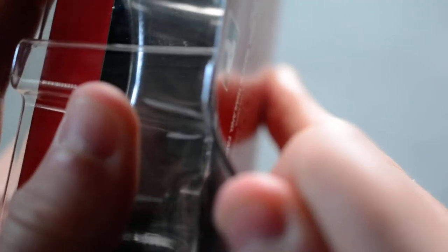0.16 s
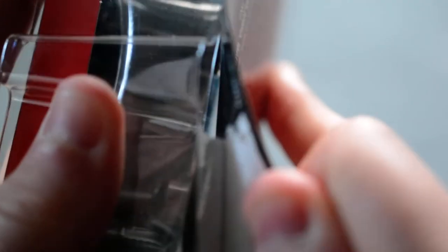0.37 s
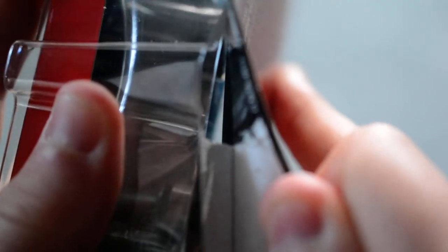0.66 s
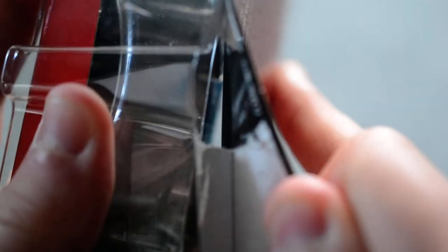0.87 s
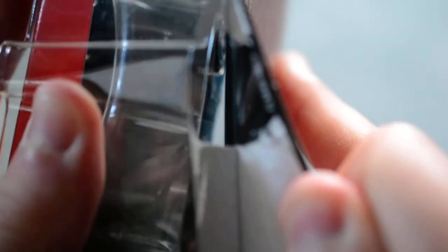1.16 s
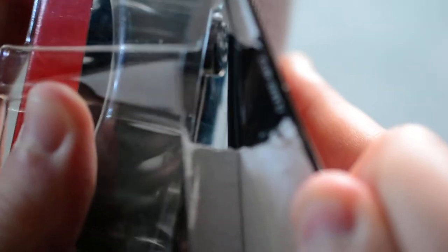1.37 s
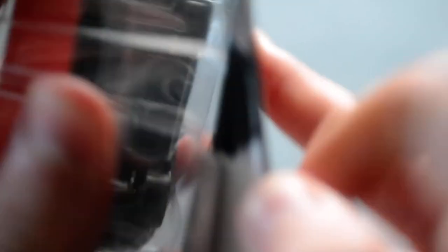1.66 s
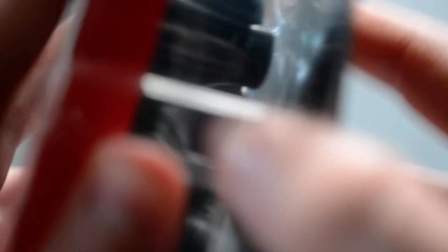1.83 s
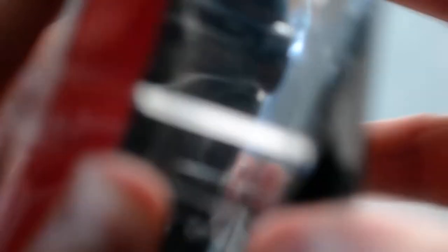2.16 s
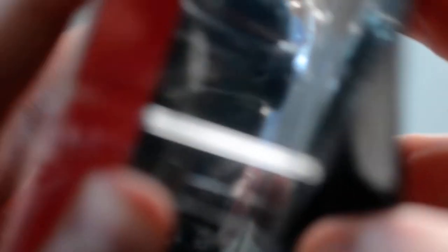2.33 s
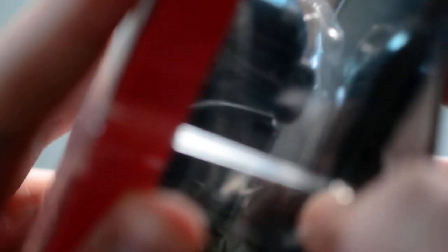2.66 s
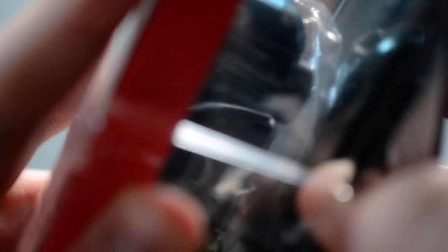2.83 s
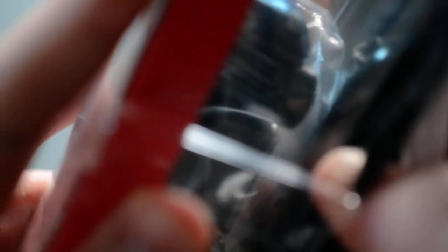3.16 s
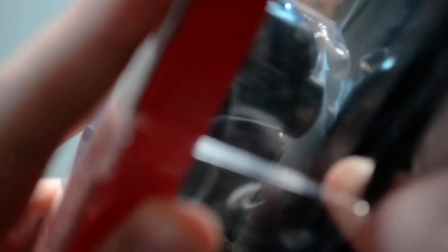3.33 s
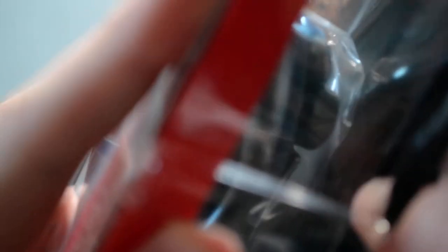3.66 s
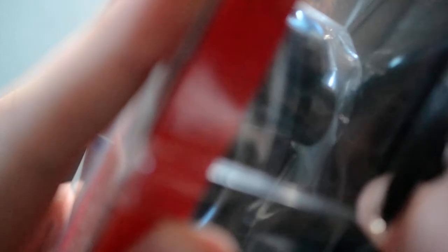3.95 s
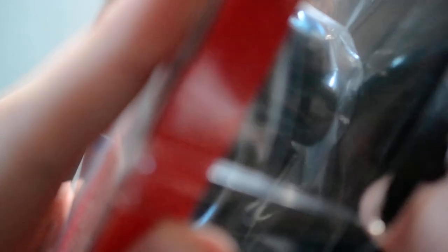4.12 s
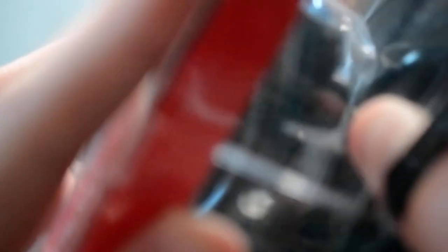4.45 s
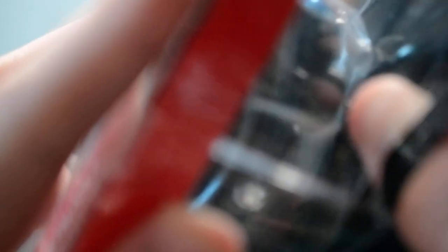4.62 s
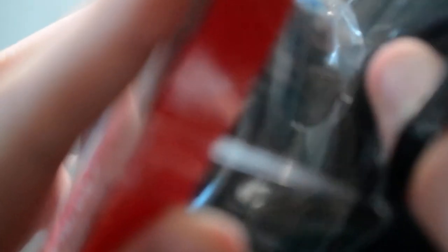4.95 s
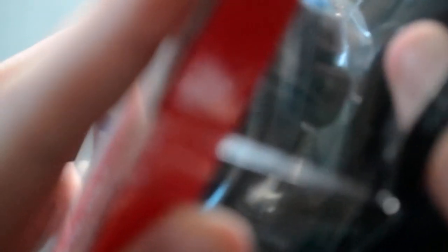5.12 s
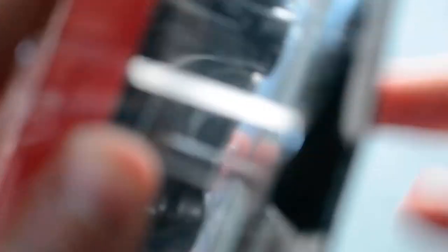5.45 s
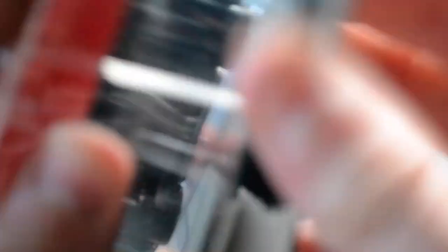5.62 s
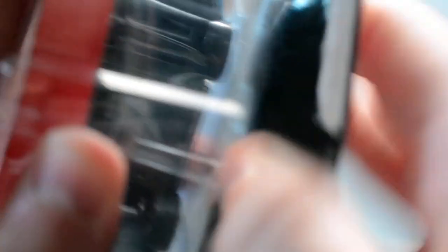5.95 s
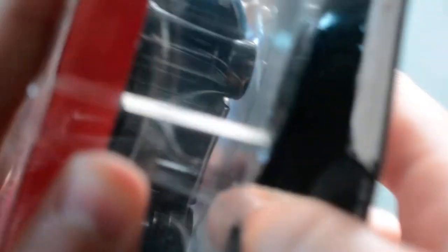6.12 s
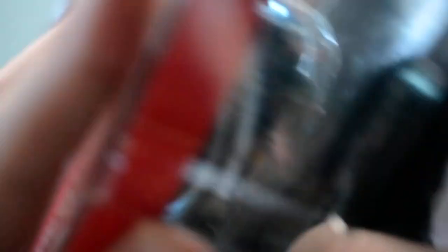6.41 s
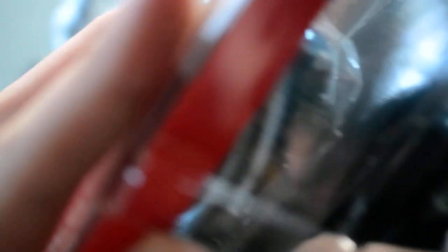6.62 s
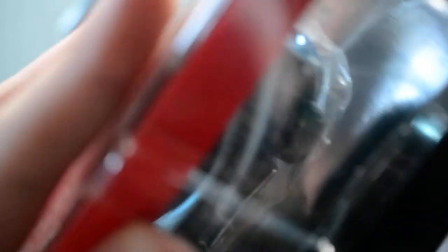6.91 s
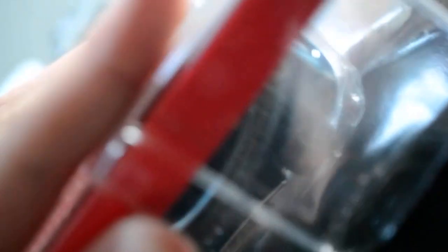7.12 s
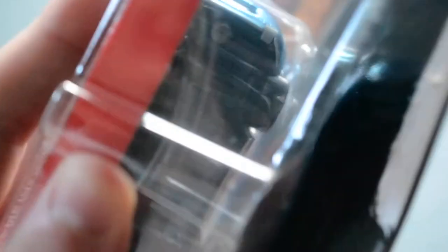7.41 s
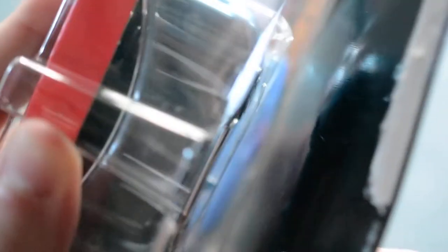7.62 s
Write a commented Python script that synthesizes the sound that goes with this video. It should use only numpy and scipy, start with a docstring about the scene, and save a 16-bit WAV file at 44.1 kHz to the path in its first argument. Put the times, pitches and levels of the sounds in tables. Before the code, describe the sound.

A hard plastic package crackles, creaks and snaps as fingers peel its glued seam open in a quiet room.

```python
"""A stiff plastic blister pack snaps and crackles as two hands pry it apart, close by in a small quiet room.
The glued seam peels in a fine crackle with ticks and short rips; the domes of the shell creak, click
and buckle with sharp snaps. Each pull builds up and lets go, the fingers shift and rub, and the hollow
pack gives dull knocks."""
import sys
import numpy as np
from scipy import signal
from scipy.io import wavfile

SR = 44100
rng = np.random.default_rng(int(sys.argv[2]) if len(sys.argv) > 2 else 0)


def unload_wav(signal):
    """Save mono or channel-first audio to the path in sys.argv[1] as 16-bit WAV at rate SR, clipped to [-1, 1]."""
    wavfile.write(
        sys.argv[1],
        SR,
        np.round(np.clip(np.atleast_2d(signal).T, -1, 1) * 32767).astype(np.int16),
    )


N = 343098
TIME = np.arange(N) / SR  # seconds through the scene
HIT_TIME = np.arange(2048) / SR  # seconds through one short hit


def amp(db):
    """Turns decibels into a gain."""
    return 10 ** (np.asarray(db) / 20)


def unit_level(x):
    """Scales a sound to an average (rms) level of 1."""
    return x / np.sqrt(np.mean(x ** 2) + 1e-20)


def unit_hit(x, span_s=0.012):
    """Gives a short sound the energy of span_s seconds at level 1."""
    return x * np.sqrt(span_s * SR / (np.sum(x ** 2) + 1e-20))


def look_up(points, hz):
    """Reads between the rows of a table, along a logarithmic frequency axis."""
    row_hz, value = np.transpose(points)
    return np.interp(np.log(hz + 1), np.log(row_hz + 1), value)


def add(mix, start_s, sound):
    """Mixes a sound in at its start time."""
    part = mix[max(round(start_s * SR), 0):][:len(sound)]
    part += sound[:len(part)]


def band(x, low_hz, high_hz, order=3):
    """Keeps the sound between two frequencies."""
    return signal.sosfilt(signal.butter(order, [low_hz, high_hz], "band", fs=SR, output="sos"), x)


def colour(x, tone, size=2048):
    """Filters a sound to follow a tone table, with no ringing ahead of a hit."""
    log_gain = np.log(amp(look_up(tone, abs(np.fft.fftfreq(size, 1 / SR)))))
    taps = np.fft.ifft(np.exp(np.conj(signal.hilbert(log_gain)))).real
    return signal.oaconvolve(x, taps[:size // 2])[:len(x)]


def strike(resonances, uneven_db=2.0, detune=0.048):
    """One blow rings several notes: the spot it hits sets their shares, and strain detunes them."""
    hz, width, db = np.transpose(resonances)[:, :, None]
    share, strain, side = rng.standard_normal((3, len(hz), 1))
    waves = np.sin(2 * np.pi * hz * (1 + detune * strain) * HIT_TIME) * np.exp(-np.pi * width * HIT_TIME)
    return unit_hit(np.sum(np.sign(side) * amp(db + uneven_db * share) * width * waves, 0))


def slips(per_s, spread_db):
    """A train of tiny random slips, a few much larger than the rest."""
    size = amp(spread_db * np.minimum(rng.exponential(1, N), 6.34))
    return size * rng.choice([-1, 1], N) * (rng.random(N) < per_s / SR)


# The notes the plastic shell rings at. Each row: pitch in Hz, width in Hz (wider dies sooner), level in dB.
SHELL_NOTES = [(850, 130, 5), (1030, 42, 5), (1500, 140, 4.5), (1784, 180, 0.5), (2350, 210, -2.5),
               (2646, 210, -5.5), (3166, 200, -3), (3594, 170, -6), (4040, 180, -11), (4760, 170, -6.5),
               (5570, 790, -8), (6560, 360, -8.5), (7430, 720, -11.5), (8900, 450, -20),
               (9060, 3100, -15.5)]


def crackle(per_s, spread_db, spots=16):
    """Tiny breaks at many spots of the seam, each ringing the shell in its own way."""
    breaks, spot = slips(per_s, spread_db), rng.integers(0, spots, N)
    rings = (signal.oaconvolve(breaks * (spot == k), strike(SHELL_NOTES))[:N] for k in range(spots))
    return unit_level(sum(rings))


def surges(per_s, depth_db):
    """A gain that swells and stalls at random, as the plastic catches and gives."""
    waits, heights = rng.random((1000, 2)).T
    times = np.cumsum(-np.log(waits)) / per_s
    return amp(np.interp(TIME, times, depth_db * (2 * heights - 1)))


def effort(moves, rest_db, build_db, relax_s, take_hold_s=0.016):
    """A gain for the hands: each move takes hold quickly, builds up force, then relaxes."""
    power = np.full(N, amp(rest_db) ** 2)  # the hands never hold quite still
    for start, length, db in moves:
        hold = np.clip((TIME - start) / take_hold_s, 0, 1)
        build = amp(db - build_db * np.clip(1 - (TIME - start) / length, 0, 1))
        relax = np.exp(-np.maximum(TIME - start - length, 0) / relax_s)
        power += (hold * build * relax) ** 2
    return np.sqrt(power)


# The tones of breaking glue and of bending plastic. Each row: frequency in Hz, level in dB.
GLUE_TONE = [(100, -18.5), (900, -9), (1700, 0), (3000, 5), (6000, 6), (9500, 10.5), (11000, 4),
             (12000, -13), (16000, -63.5)]
CREAK_TONE = [(100, -21), (500, -11), (950, -3), (1700, 0), (2600, -5), (11000, -29)]
# Pulls of the hands. Each row: start in seconds, length in seconds, peeling in dB, creaking in dB.
HAND_PULLS = [(0.0, 0.071, -52.5, -78), (0.261, 0.25, -50.5, -86), (0.535, 0.46, -49.5, -78),
              (1.003, 0.39, -46, -59), (1.582, 0.12, -56.5, -64), (1.744, 0.32, -67, -49),
              (2.115, 0.27, -64, -53), (2.604, 0.16, -58.5, -63), (2.874, 0.17, -58.5, -63),
              (3.186, 0.29, -55.5, -58), (3.5, 0.26, -50, -60), (3.899, 0.083, -46.5, -66),
              (4.063, 0.095, -57.5, -55), (4.247, 0.13, -62, -52), (4.769, 0.41, -59.5, -70),
              (5.578, 0.12, -59, -58), (5.933, 0.23, -55, -52), (6.247, 0.2, -53, -49),
              (6.499, 0.27, -57, -54), (6.792, 0.22, -46.5, -43.5), (7.112, 0.03, -50.5, -46.5),
              (7.218, 0.1, -54.5, -59), (7.384, 0.073, -57.5, -50), (7.682, 0.077, -50, -62)]


def pulls():
    """Each pull peels the glue in fine grains and bends the panels until they creak."""
    start, length, peel_db, creak_db = np.transpose(HAND_PULLS)
    pull = effort(zip(start, length, peel_db), rest_db=-83.5, build_db=6, relax_s=0.058)
    bend = effort(zip(start, length, creak_db), rest_db=-67.5, build_db=7.5, relax_s=0.055)
    grains = unit_level(crackle(per_s=55, spread_db=3) + 0.7 * crackle(per_s=2500, spread_db=2.2))
    grains *= surges(per_s=35, depth_db=4)
    peel = unit_level(colour(grains, GLUE_TONE))
    # the same grains shake the bent panels, along with slips of their own
    creak = unit_level(colour(grains + 0.8 * crackle(per_s=400, spread_db=4.5), CREAK_TONE))
    return peel * pull + creak * bend


def crease(run_s, chatter):
    """The force of a running crease: one jump, then a chatter that dies in a few milliseconds."""
    force = chatter * rng.standard_normal(len(HIT_TIME)) * np.exp(-HIT_TIME / run_s)
    force[0] = 1
    return force


def through_shell(force):
    """A short force sets the shell ringing."""
    return signal.fftconvolve(force, strike(SHELL_NOTES))[:len(HIT_TIME)]


# The notes of the hollow pack's air and walls. Each row: pitch in Hz, width in Hz, level in dB.
HOLLOW_NOTES = [(161, 390, -9.5), (254, 35, -10), (333, 5.9, 18.5), (453, 38, 9.5), (610, 53, 12)]


def thud():
    """A jolt rings the hollow pack, low and brief."""
    return unit_hit(band(strike(HOLLOW_NOTES) * np.exp(-HIT_TIME / 0.014), 150, 1500, order=2))


# Panels of the shell buckle. Each row: start in seconds, panel pitch in Hz, pop level in dB,
# sharpness in dB (how much louder the crack is than the pop).
PANEL_SNAPS = [(0.0656, 785, -18, -8), (0.1897, 1480, -17.5, 2), (1.5474, 1570, -41.5, -4),
               (1.567, 1330, -31.5, -26), (1.797, 920, -36, -5), (2.0596, 1100, -33, -13.5),
               (2.2903, 915, -19, -2.5), (3.2797, 1030, -25, -11.5), (3.6163, 1500, -27, -10),
               (3.9095, 1550, -29.5, -8.5), (3.996, 1340, -20, -8), (4.2759, 1106, -39.5, 5.5),
               (5.1774, 890, -21.5, 1.5), (5.346, 1380, -42, 0.5), (5.5624, 830, -50.5, 9),
               (5.5684, 980, -27.5, -22), (5.635, 900, -40.5, -1.5), (5.6974, 1030, -29.5, -2.5),
               (5.7248, 1430, -30.5, -29), (5.7548, 1490, -34, -2.5), (5.9765, 1010, -30.5, 1.5),
               (6.3436, 1500, -36.5, -2.5), (6.3572, 1500, -24.5, 1.5), (6.803, 1380, -30.5, -9.5),
               (6.929, 1770, -48, 14), (7.0159, 1516, -10, -6.5), (7.1504, 1095, -20.5, -22.5),
               (7.2257, 1610, -23.5, -8), (7.285, 1370, -38, 4.5), (7.32, 1720, -51, 14),
               (7.4236, 970, -31.5, -3), (7.742, 1750, -26.5, -2)]


def snaps(stray_octaves=0):
    """A panel flips over: it pops at its own pitch, the crease cracks, and the hollow thuds."""
    out = np.zeros(N)
    for start, hz, pop_db, sharp_db in PANEL_SNAPS:
        force = crease(run_s=0.0017, chatter=0.29)
        shell = unit_hit(through_shell(force)) + 0.22 * unit_hit(force)  # some is heard directly
        pitch = hz * 2 ** (stray_octaves * rng.uniform(-0.92, 1))
        panel = np.sin(2 * np.pi * pitch * HIT_TIME)
        panel *= np.exp(-HIT_TIME / 0.0015) * (1 - np.exp(-HIT_TIME / 0.0006))
        panel = np.diff(panel, prepend=0)  # a small panel gives off no bass
        body = band(shell, pitch / np.sqrt(2), pitch * np.sqrt(3), order=2)
        pop = unit_hit(unit_hit(panel) + 1.1 * unit_hit(body))
        crack = amp(sharp_db) * unit_hit(band(shell, 1900, 4400))
        # the sharper the crease, the more it ticks at the edge
        tick = amp(1.5 * sharp_db - 4) * unit_hit(band(shell, 4700, 10400, order=4))
        add(out, start, amp(pop_db) * (pop + crack + tick + amp(-29) * thud()))
    return out


# The hollow pack knocks, often together with a snap. Each row: start in seconds, level in dB.
HOLLOW_KNOCKS = [(0.191, -34.5), (1.5468, -53.5), (1.8, -42), (1.8839, -44), (2.062, -44), (3.997, -41),
                 (4.2658, -47.5), (4.347, -46.5), (5.234, -29), (5.2425, -28.5), (5.5861, -42.5),
                 (5.699, -47), (5.726, -41.5), (6.358, -47.5), (6.6754, -48), (7.152, -41), (7.398, -48.5),
                 (7.425, -48.5)]


def knocks():
    """The hollow pack gives a dull low knock: a thud plus the low notes of the shell."""
    out = np.zeros(N)
    for start, db in HOLLOW_KNOCKS:
        shell = unit_hit(band(strike(SHELL_NOTES), 500, 1830, order=2))
        add(out, start, amp(db) * (thud() + amp(1) * shell))
    return out


# Stretches of seam rip. Each row: loudest moment in seconds, level in dB, swell in seconds,
# fade in seconds, brightness from 0 to 1.
SEAM_RIPS = [(0.195, -27.5, 0.0048, 0.026, 0.64), (1.296, -33, 0.0076, 0.017, 0.72),
             (1.616, -34, 0.001, 0.0067, 0.5), (3.653, -38.5, 0.0052, 0.0092, 0.3),
             (4.281, -31.5, 0.0094, 0.013, 0.07), (5.188, -22, 0.0086, 0.02, 0.4),
             (5.243, -30, 0.0059, 0.006, 0.4), (5.694, -31.5, 0.019, 0.0047, 0),
             (5.981, -23.5, 0.0067, 0.0081, 0.38), (6.901, -40.5, 0.0039, 0.025, 0.76),
             (7.014, -23.5, 0.0068, 0.0024, 0.5)]


def rips():
    """A flurry of tiny breaks swells and fades, bright at the edge or dull through the shell."""
    dull = unit_level(band(crackle(per_s=1800, spread_db=1.2), 340, 6000, order=2))
    bright = unit_level(colour(crackle(per_s=2500, spread_db=4.6), GLUE_TONE))
    out = np.zeros(N)
    for peak, db, swell, fade, brightness in SEAM_RIPS:
        near = abs(TIME - peak) < 0.2
        envelope = np.exp(-np.maximum((peak - TIME[near]) / swell, (TIME[near] - peak) / fade))
        blend = brightness * bright[near] + (1 - brightness) * dull[near]
        out[near] += amp(db) * envelope * blend / np.hypot(brightness, 1 - brightness)
    return out


# Spots of glue let go. Each row: start in seconds, level in dB.
GLUE_TICKS = [(0.501, -40), (0.524, -38.5), (0.557, -42.5), (0.594, -41.5), (0.645, -41), (0.68, -45),
              (0.781, -37.5), (0.924, -33), (0.981, -35), (1.257, -38), (1.38, -42.5), (2.658, -39.5),
              (2.726, -44.5), (2.738, -35.5), (2.751, -45), (2.95, -44.5), (3.069, -42), (3.42, -41),
              (3.699, -43.5), (5.061, -47), (5.132, -46.5), (6.126, -40.5), (6.889, -43), (6.976, -38),
              (7.298, -32.5), (7.512, -38.5)]


def ticks():
    """A single spot of glue breaks and rings the shell with a bright tick."""
    out = np.zeros(N)
    for start, db in GLUE_TICKS:
        shell = through_shell(crease(run_s=0.0044, chatter=0.045))
        add(out, start, amp(db) * unit_hit(colour(shell, GLUE_TONE), span_s=0.0045))
    return out


# The tone of rubbing skin. Each row: frequency in Hz, level in dB.
SKIN_TONE = [(40, -23.5), (130, -21.5), (250, -6), (800, -3.5), (1500, -11), (4000, -44.5), (12000, -58)]
# The fingers shift their grip. Each row: start in seconds, length in seconds, level in dB.
GRIP_SHIFTS = [(1.58, 0.15, -55.5), (1.78, 0.33, -58), (2.12, 0.2, -59.5), (4.26, 0.15, -54.5),
               (5.86, 0.31, -57), (6.3, 0.055, -59), (6.8, 0.36, -63)]


def rubbing():
    """Skin sticks and slips on the hollow shell."""
    grip = effort(GRIP_SHIFTS, rest_db=-75, build_db=5, relax_s=0.044)
    return grip * unit_level(colour(slips(per_s=320, spread_db=3.5), SKIN_TONE))


# Bent panels click. Each row: start in seconds, level in dB.
PANEL_CLICKS = [(1.786, -39.5), (1.936, -45.5), (2.225, -46), (2.2863, -34), (2.422, -44), (2.554, -53),
                (3.242, -49), (3.388, -48), (3.789, -45.5), (5.502, -51.5), (5.928, -49), (6.458, -46.5),
                (6.472, -51), (6.4977, -39.5), (6.767, -45)]


def clicks():
    """A bent panel gives a little and rings the shell with a dull click."""
    out = np.zeros(N)
    for start, db in PANEL_CLICKS:
        add(out, start, amp(db) * unit_hit(band(strike(SHELL_NOTES), 800, 3200, order=1)))
    return out


# How long the room rings. Each row: frequency in Hz, seconds to fade by 60 dB.
ECHO_FADES = [(200, 0.18), (900, 0.17), (2500, 0.18), (6000, 0.14), (11000, 0.13)]


def room_echo(x):
    """A small damped room: scattered reflections after a short gap, the treble dying first."""
    t = np.arange(SR // 2) / SR
    reflections = rng.standard_normal(len(t)) * (rng.random(len(t)) < 5000 / SR) * (t > 0.006)
    hz, age, spectrum = signal.stft(reflections, SR, nperseg=256)
    fade = amp(-60 * age / look_up(ECHO_FADES, hz)[:, None])
    tail = signal.istft(spectrum * fade, SR, nperseg=256)[1]
    return signal.oaconvolve(x, tail / np.linalg.norm(tail))[:N]


# The tone of the quiet room. Each row: frequency in Hz, level in dB.
HUSH_TONE = [(25, -17.5), (90, -7.5), (400, 2), (900, 0), (2000, -7.5), (5000, -9.5), (10500, -18),
             (12000, -23), (16000, -58.5)]


def scene():
    """The pack close by, its faint echo, and the hush of the room."""
    facing = snaps()
    handling = pulls() + knocks() + rips() + ticks() + rubbing() + clicks()
    # the other faces of the pack ring differently, and all of them reach the walls
    outward = (facing + sum(snaps(stray_octaves) for stray_octaves in (0.54, 0.2, 0.65))) / 2
    echo = room_echo(amp(-18.5) * outward + amp(-16.5) * handling)
    hush = amp(-69.5) * unit_level(colour(rng.standard_normal(N), HUSH_TONE))
    return (facing + handling + echo + hush)[None]


def record(dry):
    """The sound has a dip in the treble and is cut off above 11 kHz; the hardest snaps overload."""
    dipped = 0.3 * dry + 0.7 * signal.lfilter(*signal.iirnotch(7850, 13, fs=SR), dry)
    dulled = signal.sosfilt(signal.butter(14, 11000, fs=SR, output="sos"), dipped)
    ceiling = 0.75
    clipped = dulled / (1 + (dulled / ceiling) ** 8) ** (1 / 8)
    # the overload is lopsided, so each one leaves a low bump
    bump = signal.sosfilt(signal.butter(2, 170, fs=SR, output="sos"), (clipped / ceiling) ** 6)
    top_cut = signal.firwin(255, 16000, window=("kaiser", 9), fs=SR)
    return signal.oaconvolve(clipped - amp(-19.5) * bump, top_cut[None], "same")


dry = scene()
out = record(dry)
unload_wav(out)
```